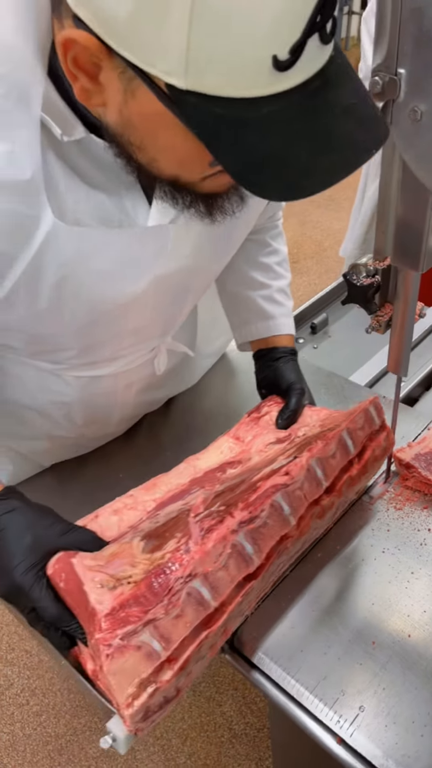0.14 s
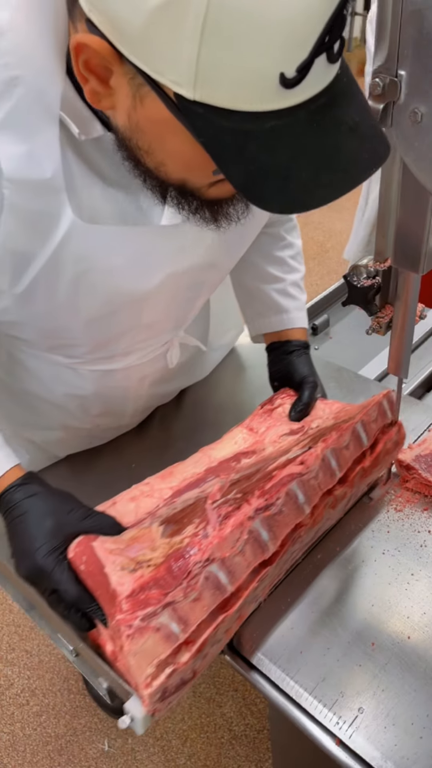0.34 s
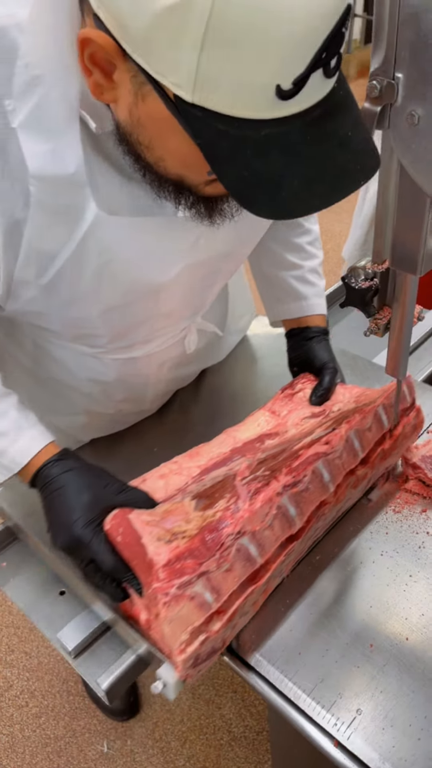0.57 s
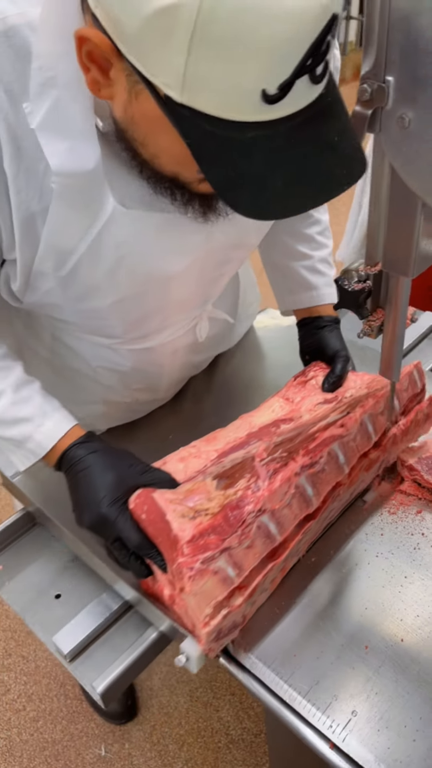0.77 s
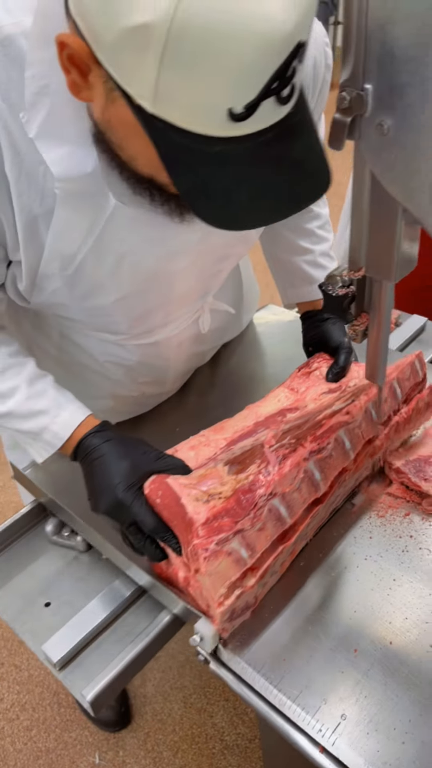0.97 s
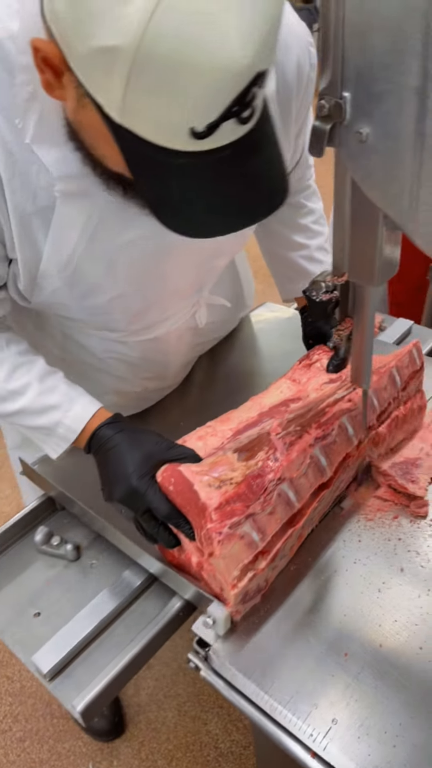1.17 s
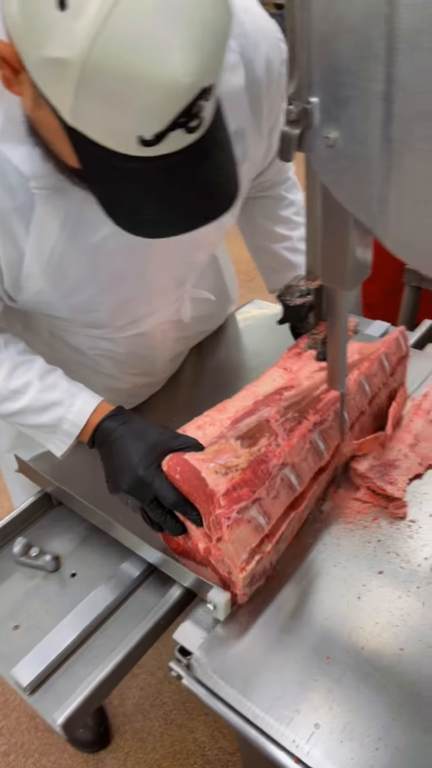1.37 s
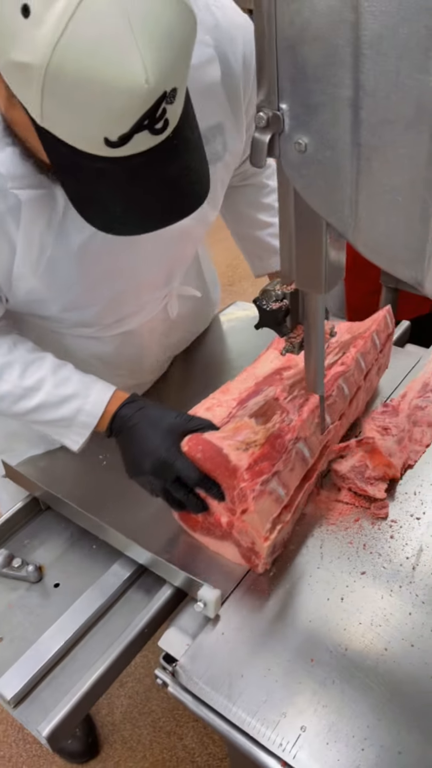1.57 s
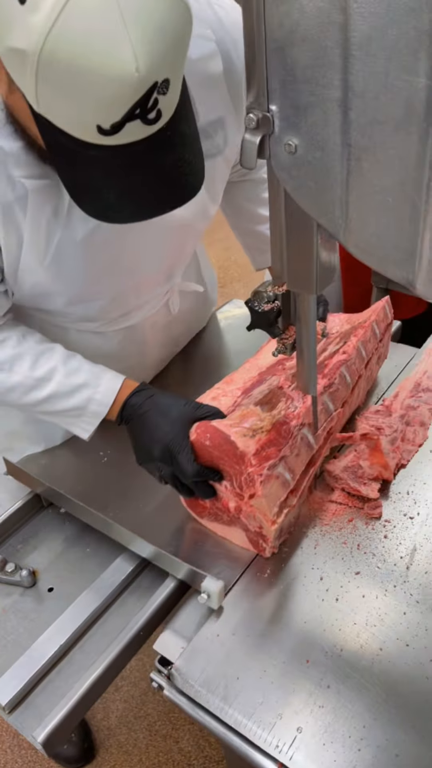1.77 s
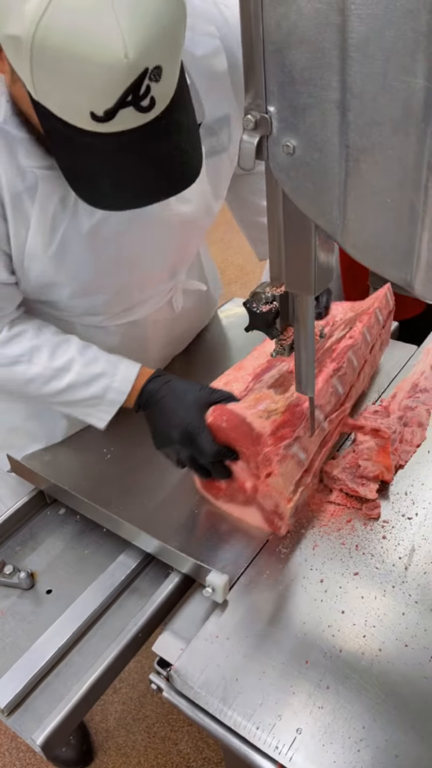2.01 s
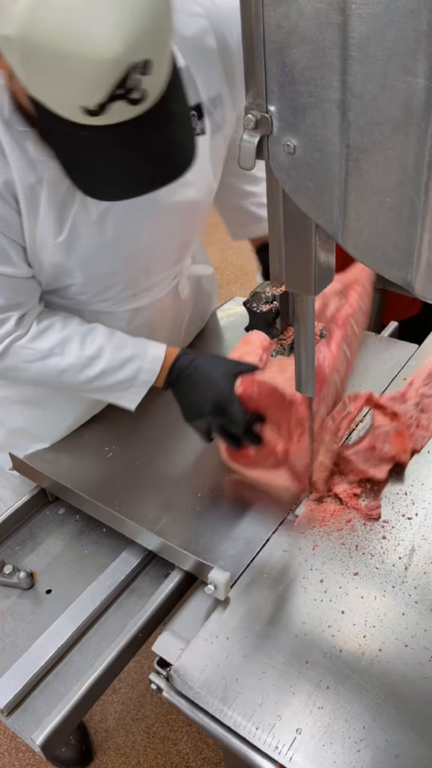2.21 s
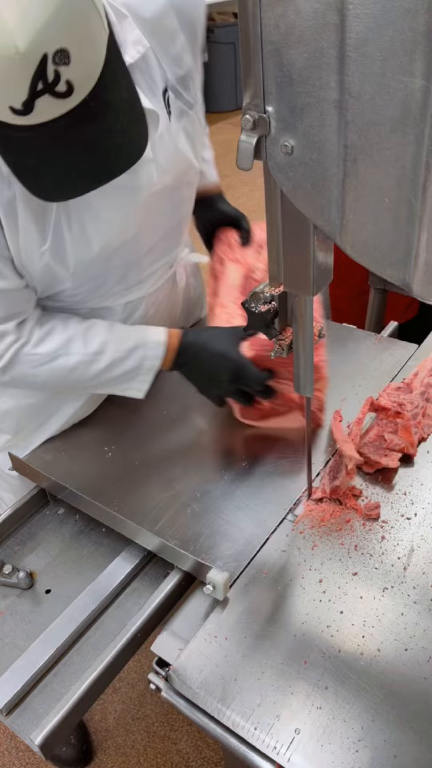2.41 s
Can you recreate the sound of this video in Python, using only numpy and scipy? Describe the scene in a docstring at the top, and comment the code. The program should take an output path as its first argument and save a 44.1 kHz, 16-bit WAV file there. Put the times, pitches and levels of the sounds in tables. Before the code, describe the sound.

A meat band saw rasps and whines harshly through bone-in beef in a hard-walled cutting room

```python
"""Meat band saw through bone

The saw rasps through bone for two seconds in a hard-walled cutting room; machine and room rumble below.
Tooth strikes whine and squeal on multiples of their rate and gate a hiss of chips.
Once per blade loop the welded joint tears as a noise burst and rings steel resonances.
The saw echoes in a decaying noise tail; the rumble is shaped noise with blurred hums."""
import sys
import numpy as np
from scipy import signal
from scipy.fft import rfft, irfft
from scipy.io import wavfile

SR = 44100
rng = np.random.default_rng(int(sys.argv[2]) if len(sys.argv) > 2 else 0)


def field_ratio(decibels):
    """Amplitude ratio for a level in dB (20 dB per decade); scalars and array-likes work."""
    return 10 ** (np.asarray(decibels, dtype=float) / 20)


def waveform_to_disk(signal):
    """Save audio, clipped to [-1, 1], as 16-bit WAV at the path in sys.argv[1]."""
    frames = np.transpose(np.atleast_2d(signal))
    scaled = np.clip(frames, -1, 1) * 32767
    samples = np.round(scaled).astype(np.int16)
    wavfile.write(sys.argv[1], SR, samples)


N = 108045


def rms_one(x):
    """Scale to rms 1."""
    return x / np.sqrt(np.mean(np.abs(x) ** 2) + 1e-20)


def in_time(rows):
    """Interpolate the columns of a time table, sample by sample."""
    s, *columns = np.transpose(rows)
    return [np.interp(np.arange(N) / SR, s, c) for c in columns]


def drift(rate_hz):
    """Random wander, rms 1: noise at SR/20 through two equal poles at rate_hz."""
    pole = np.exp(-40 * np.pi * rate_hz / SR)
    noise = rng.standard_normal(N // 20 + 2002)
    slow = signal.lfilter([1], [1, -2 * pole, pole * pole], noise)[2000:]  # drop the settling
    return np.interp(np.arange(N) / 20, np.arange(len(slow)), rms_one(slow))


def complex_drift(rate_hz):
    """Two independent wanders as real and imaginary part: blurs a tone into a narrow band."""
    return drift(rate_hz) + 1j * drift(rate_hz)


def bin_hz():
    """Frequencies of the rfft bins."""
    return np.arange(N // 2 + 1) * SR / N


def coloured(x, spectrum):
    """Filter by a spectrum table, interpolated over log frequency; rms 1."""
    hz, db = np.transpose(spectrum)
    gain_db = np.interp(np.log(np.maximum(bin_hz(), 1)), np.log(hz), db)
    return rms_one(irfft(rfft(x) * field_ratio(gain_db), N))


def patchy(x, patchy_db, top_db):
    """Third-octave bands flicker independently; those above 10 kHz also follow top_db."""
    spec, hz, out = rfft(x), bin_hz(), 0
    edges_hz = np.r_[0, 1000 * 2 ** np.arange(0, 4.1, 1 / 3), SR]
    for low, high in zip(edges_hz, edges_hz[1:]):
        band = irfft(spec * ((hz >= low) & (hz < high)), N)
        out = out + band * field_ratio(patchy_db * drift(11.3) + (top_db if low > 10000 else 0))
    return out


# pressure of bone on blade: t/s, level/dB, top treble/dB (its mean is removed)
FEED = [(0.215, -26.5, -7.5), (0.357, -19.5, -6), (0.367, -28.5, -5), (0.417, -29, -7), (0.495, -24, -4.5),
        (0.555, -26.5, -4.5), (0.659, -19, -5), (0.665, -29, -2.5), (0.715, -33, 3), (0.741, -23, -1.5),
        (0.775, -26.5, 1), (0.803, -20, -2), (0.819, -30, -8.5), (0.895, -25.5, -1.5), (0.945, -29.5, -1),
        (0.957, -33, -15), (0.973, -33.5, 0.5), (1.115, -22.5, -6), (1.127, -31.5, -3), (1.237, -25, -4.5),
        (1.259, -21, -7), (1.297, -33.5, -2), (1.413, -19.5, -7.5), (1.423, -30.5, 0), (1.533, -27.5, -5.5),
        (1.561, -25.5, -1.5), (1.617, -31, -4.5), (1.731, -29.5, -0.5), (1.837, -33, -5),
        (1.995, -31, -1.5), (2.023, -26.5, -5.5), (2.083, -30, -8), (2.111, -30.5, -3.5),
        (2.161, -29.5, -4), (2.171, -22, -7), (2.19, -27, -10.5)]
FLUTTER_DB, WHINE_DB, CHIPS_DB = 1.45, -4.5, -3
BITE_S, BITE_RISE_S, EXIT_S, EXIT_FALL_S = 0.209, 0.0068, 2.185, 0.0059


def teeth():
    """Whine, squeal and chips of the strikes; bone pressure sets the level of whine and chips."""
    level_db, top_db = in_time(FEED)
    top_db = top_db - top_db.mean()
    turn = tooth_phase()
    whining = field_ratio(WHINE_DB) * whine(turn, top_db)
    squealing = squeal(turn)
    hissing = field_ratio(CHIPS_DB) * chips(turn, top_db)
    pressed = field_ratio(level_db + FLUTTER_DB * drift(52.0)) * (whining + hissing)
    t = np.arange(N) / SR
    bite = np.clip((t - BITE_S) / BITE_RISE_S, -30, 0)
    leave = np.clip((EXIT_S - t) / EXIT_FALL_S, -30, 0)
    return np.exp(bite + leave) * (pressed + squealing)


# tooth rate before wobble: t/s, f/Hz
SPEED = [(.22, 1239), (.4, 1237), (.7, 1227), (.95, 1218), (1.12, 1218), (1.3, 1235), (1.5, 1220),
         (1.62, 1208), (1.8, 1221), (2.0, 1212), (2.1, 1191), (2.19, 1179)]
TOOTH_WOBBLE = .002  # relative rms


def tooth_phase():
    """Phase of the strikes in radians: the wobbling tooth rate, integrated."""
    rate_hz, = in_time(SPEED)
    return 2 * np.pi * np.cumsum(rate_hz * (1 + TOOTH_WOBBLE * drift(9.0))) / SR


# whine partials: multiple of tooth rate, relative level/dB
TEETH = [(1, -28), (5, -10.5), (6, -2.5), (7, -7.5), (8, -11), (9, -12), (10, -4), (11, -6), (12, -1.5),
         (13, -6.5)]
WHINE_SWELL_DB = 2


def whine(turn, top_db):
    """Swelling partials on multiples of the tooth rate, the upper ones following top_db; rms 1."""
    total = 0
    for k, db in TEETH:
        level_db = db + WHINE_SWELL_DB * drift(15.6) + (top_db if k > 8 else 0)
        total = total + field_ratio(level_db) * multiple(turn, k)
    return rms_one(total)


# the tone roughens as the blade goes deeper: t/s, roughness/0-1
ROUGHNESS = [(.2, .4), (.4, .55), (.7, .85), (2.0, .9), (2.15, 1)]
WHINE_WANDER_HZ, SKIRT_DB, SKIRT_HZ = 18, -1, 150  # wander at k = 1


def multiple(turn, k):
    """One multiple of the tooth rate; uneven teeth blur it, faster the higher it lies; rms 1."""
    rough, = in_time(ROUGHNESS)
    blur = complex_drift(WHINE_WANDER_HZ * k ** .25)
    skirt = field_ratio(SKIRT_DB) * complex_drift(SKIRT_HZ)
    waver = np.sqrt(1 - rough) + np.sqrt(rough / 2) * (blur + skirt)
    tone = np.exp(1j * (round(k) * turn + rng.uniform(0, 2 * np.pi)))
    return rms_one(np.real(waver * tone))


# squeal: t/s, level of multiple 2/dB, of 3/dB, of 4/dB (before flicker)
SQUEAL = [(0.215, -50, -56, -41), (0.263, -46.5, -48, -51), (0.301, -43, -54, -36), (0.423, -56, -64, -50),
          (0.483, -54, -56.5, -42), (0.561, -49, -57, -51), (0.599, -60, -53, -33), (0.665, -44, -59, -43),
          (0.693, -62, -58, -41.5), (0.769, -48, -49, -43), (0.813, -48, -65, -48),
          (0.885, -60, -49, -42.5), (0.967, -54, -53, -39.5), (0.979, -55, -61, -62),
          (1.027, -63, -58, -53), (1.061, -56, -45, -41), (1.111, -58, -48, -39.5), (1.143, -66, -58, -56),
          (1.269, -45.5, -47.5, -36), (1.303, -64, -68, -48), (1.357, -62, -41.5, -34.5),
          (1.441, -58, -53, -50.5), (1.489, -51, -50, -44), (1.523, -62, -59, -41.5),
          (1.577, -48, -53, -42.5), (1.655, -58, -53, -38), (1.875, -52.5, -53.5, -54.5),
          (1.929, -62, -57, -46), (1.991, -49, -56, -53), (2.023, -47, -63, -39.5),
          (2.127, -53, -61, -48.5), (2.19, -37, -42.5, -39)]
SQUEAL_FLICKER_DB = 2


def squeal(turn):
    """Low multiples of the tooth rate, each with its own level curve and flicker."""
    total = 0
    for k, db in enumerate(in_time(SQUEAL), start=2):
        total = total + field_ratio(db + SQUEAL_FLICKER_DB * drift(11.0)) * multiple(turn, k)
    return total


# chip hiss spectrum: f/Hz, relative density/dB per Hz
CHIPS = [(530, -42), (900, -32.5), (2250, -18), (2420, -14), (3150, -20), (4150, -14), (4860, -8.5),
         (5480, -11.5), (7310, -0.5), (10400, -8.5), (12000, 3.5), (16000, -3.5)]
CHIPS_GATE, CHIPS_PATCHY_DB = 0.44, 1.64


def chips(turn, top_db):
    """Chip noise pulsing with every strike, then coloured and made patchy; rms 1."""
    noise = rng.standard_normal(N)
    strikes = noise * np.exp(CHIPS_GATE * np.cos(turn) + 0.18 * drift(370.0))
    return rms_one(patchy(coloured(strikes, CHIPS), CHIPS_PATCHY_DB, top_db))


def joint_shape(at_s, level_db, rise_s, fall_s):
    """Sum of passes, each swelling exponentially to its moment and decaying after it."""
    t, out = np.arange(N) / SR, 0
    for s, db in zip(at_s, level_db):
        out = out + field_ratio(db) * np.exp(np.where(t < s, (t - s) / rise_s, (s - t) / fall_s))
    return out


# joint passes, one row each: tear envelope peak/dB, ring push peak/dB
JOINT = [(-26, -49.5), (-27, -46.5), (-19, -38), (-30, -42), (-16, -48), (-21.5, -47.5), (-21, -45),
         (-40, -48), (-16, -36), (-26, -42.5), (-26, -47), (-19.5, -43), (-20.5, -41)]
FIRST_JOINT_S, LOOP_S, RING_LAG_S = .353, .1517, 0.0036


def joint():
    """The weld tears through the cut once a loop and shakes the steel into a short ring."""
    at_s = FIRST_JOINT_S + LOOP_S * np.arange(len(JOINT))
    tear_db, ring_db = np.transpose(JOINT)
    return tear(at_s, tear_db) + ring(at_s + RING_LAG_S, ring_db)


# tear spectrum: f/Hz, relative density/dB per Hz
TEAR = [(1000, -39), (2000, -21), (3200, -21.5), (5000, -11), (7300, -5), (10300, -11), (12500, -9.5),
        (15500, -15.5), (17000, -3)]
JOINT_RISE_S, JOINT_FALL_S, TEAR_GRAIN, TEAR_PATCHY_DB = 0.0087, 0.0044, 0.44, 3.18


def tear(at_s, level_db):
    """Grainy, patchy noise bursts at the joint passes."""
    grit = rng.standard_normal(N) * np.exp(TEAR_GRAIN * drift(150.0))
    noise = patchy(coloured(grit, TEAR), TEAR_PATCHY_DB, 0)
    return noise * joint_shape(at_s, level_db, JOINT_RISE_S, JOINT_FALL_S)


# steel modes: f/Hz, relative level/dB, T60/s
STEEL = [(1180, -16, .06), (1350, -14, .06), (1812, -3, .07), (1890, -7, .05), (1965, 0, .08),
         (2080, -6, .05), (2331, -5, .07), (3560, -9, .06)]
RING_PUSH_S = 0.018


def ring(at_s, level_db):
    """Noise pushes excite damped two-pole resonances of the steel."""
    push, out = joint_shape(at_s, level_db, RING_PUSH_S / 2, RING_PUSH_S), 0
    for hz, db, t60_s in STEEL:
        r, w = field_ratio(-60 / (t60_s * SR)), 2 * np.pi * hz / SR
        shake = push * rng.standard_normal(N) * field_ratio(db - 24.5) + 1e-18
        out = out + signal.lfilter([0, np.sin(w)], [1, -2 * r * np.cos(w), r * r], shake)
    return out


ROOM_T60_S, ROOM_TOP_T60_S, WALL_CUT_HZ = .31, .2, 7900


def room(x):
    """Dense echoes of hard walls: a noise tail that dies, its treble first."""
    t = np.arange(SR // 2) / SR
    white = rng.standard_normal(len(t)) * (t > .008)  # gap before the first echo
    low = signal.sosfilt(signal.butter(1, WALL_CUT_HZ, fs=SR, output="sos"), white)
    tail = low * field_ratio(-60 * t / ROOM_T60_S) + (white - low) * field_ratio(-60 * t / ROOM_TOP_T60_S)
    return signal.fftconvolve(x, tail / np.sqrt(np.sum(tail ** 2)))[:N]


# blurred hums: f/Hz, initial level re rumble level/dB, width/Hz
HUM = [(85, -13, 15), (130.5, -10.5, 13.5), (204.6, -11.5, 13), (265, -9.5, 18), (446.4, -11, 7.6)]
HUM_FADE_DB_PER_S = 2.5


def hums():
    """Tones blurred into narrow bands, fading steadily."""
    t, total = np.arange(N) / SR, 0
    for hz, db, width_hz in HUM:
        tone = np.real(complex_drift(width_hz / 2) * np.exp(2j * np.pi * hz * t))
        total = total + field_ratio(db - HUM_FADE_DB_PER_S * t) * tone
    return total


# rumble spectrum: f/Hz, relative density/dB per Hz
RUMBLE = [(15, -48), (32, -38), (60, -7.5), (157, -8), (200, -6.5), (416, -13), (545, -16), (695, -17),
          (800, -28.5), (1290, -21.5), (2480, -26), (3520, -31.5), (5500, -27.5), (7710, -20.5),
          (10000, -32.5), (13000, -23), (17000, -28)]
# rumble course: t/s, level/dB, hiss lift above the bass/dB
RUMBLE_LEVEL = [(0.0, -40.5, -1.5), (0.37, -43, -1), (0.42, -46.5, 2), (0.77, -45.5, 1), (0.82, -48, 1.5),
                (1.32, -48, -0.5), (1.85, -51, 1), (2.22, -48, 0.5), (2.45, -53, 2)]
HISS_FROM_HZ = 390


def rumble():
    """Motor, wheels and room: broad noise with a few blurred hums."""
    level_db, hiss_db = in_time(RUMBLE_LEVEL)
    humming = hums()
    noise = coloured(rng.standard_normal(N), RUMBLE)
    hiss = irfft(rfft(noise) * (bin_hz() > HISS_FROM_HZ), N)
    return field_ratio(level_db) * (noise + (field_ratio(hiss_db) - 1) * hiss + humming)


ROOM_DB = -8.5


def scene():
    """The saw in its room over the rumble."""
    saw = teeth() + joint()
    return (saw + field_ratio(ROOM_DB) * room(saw) + rumble())[None]


def low_pass(x):
    """Removes everything above the highest recorded frequency."""
    return signal.sosfilt(signal.butter(12, 16660, fs=SR, output="sos"), x)


CUTOFF_HZ = 15740


def record(dry):
    """The top is cut sharply at CUTOFF_HZ."""
    cut = irfft(rfft(dry) * (bin_hz() < CUTOFF_HZ), N)
    return low_pass(cut)


dry = scene()
out = record(dry)
waveform_to_disk(out)
```